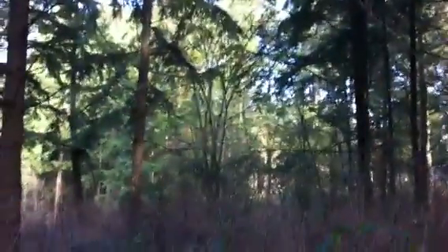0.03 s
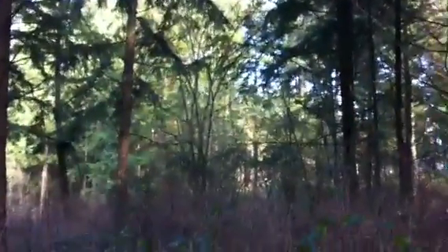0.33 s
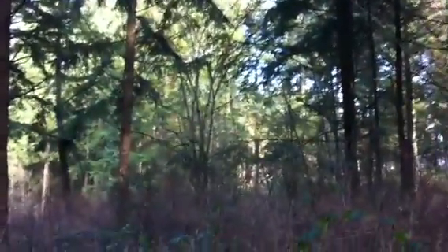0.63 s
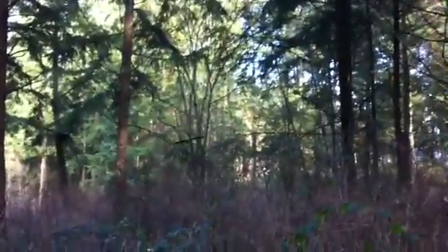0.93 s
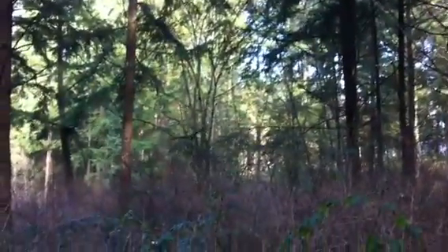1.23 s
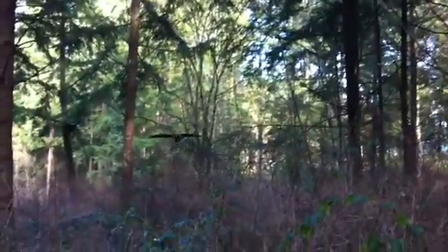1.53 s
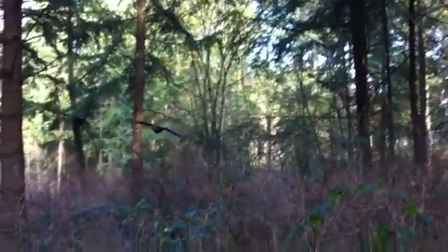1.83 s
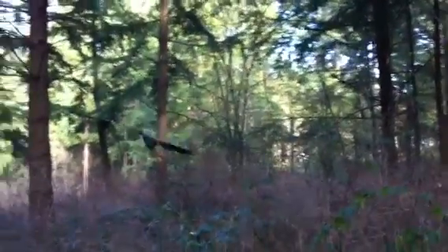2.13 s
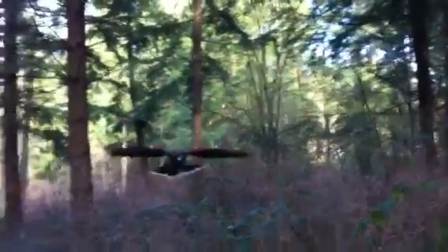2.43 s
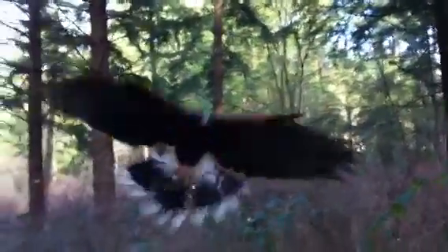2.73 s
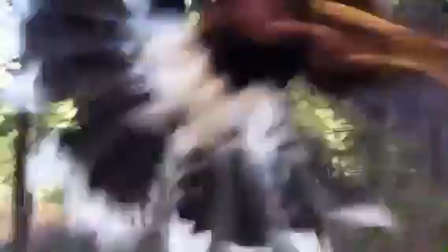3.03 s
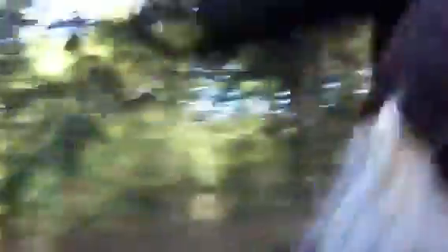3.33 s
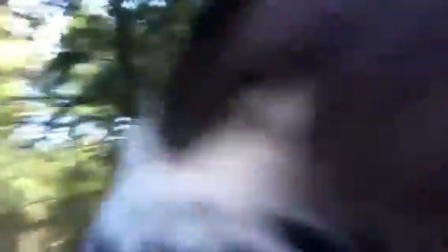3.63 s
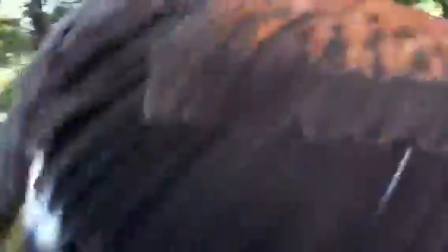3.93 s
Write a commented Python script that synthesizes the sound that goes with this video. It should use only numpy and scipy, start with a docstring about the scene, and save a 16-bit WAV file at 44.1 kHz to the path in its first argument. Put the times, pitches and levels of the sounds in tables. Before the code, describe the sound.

A hawk's little leg bells tinkle far off, then jingle close amid flapping wings.

```python
"""Quiet woodland: a trained hawk glides in and lands beside the microphone. Two small leg bells, struck by
their pellets, tinkle from afar, then jingle hard on landing, choked now and then by feathers. Feet thump on the
perch, talons scrape, metal, twigs and a feather click, wings buffet the air, feathers rustle. Behind: air in
the trees, a breeze, a far hoot, two chirps."""
import sys
import numpy as np
from scipy import signal
from scipy.io import wavfile
from scipy.ndimage import uniform_filter1d

SR = 44100
rng = np.random.default_rng(int(sys.argv[2]) if len(sys.argv) > 2 else 0)


def store_wav(level_fs):
    """Save 16-bit WAV to argv[1]."""
    pcm = np.round(np.clip(np.atleast_2d(level_fs), -1, 1) * 32767)
    wavfile.write(sys.argv[1], SR, pcm.T.astype(np.int16))


N = 176400
T = np.arange(N) / SR

# pellet strikes: (time [s], low bell [dB], high bell [dB], middle overtones [dB], shimmer [dB],
# top overtones [dB], base t60 until the next strike [s])
STRIKES = [(2.615, -64, -59, -78, -80, -66, .1), (2.792, -55.5, -51, -70, -53, -55, 0.053),
           (2.82, -72, -53.5, -92, -76, -63, 0.024), (2.845, -70.5, -58, -78, -69.5, -66, 0.036),
           (3.002, -48, -39, -48, -42, -52, 0.15), (3.047, -26, -40.5, -41.5, -33, -28, 0.65),
           (3.075, -56, -24, -38, -28, -46, 0.12), (3.096, -37, -29.5, -39.5, -25.5, -35, .11),
           (3.127, -39.5, -39, -46.5, -51, -57, .17), (3.166, -41, -33, -60, -43, -42.5, 0.23),
           (3.2023, -35, -17, -35, -27, -22, 0.21), (3.205, -43, -14, -33, -12, -24, 0.081),
           (3.2156, -36, -15, -61, -35, -45, 0.078), (3.2237, -42, -15, -56, -16, -28, .11),
           (3.2365, -42, -22, -55, -18.5, -21.5, 0.11), (3.249, -43, -45, -65, -47, -22.5, 0.023),
           (3.2739, -35, -25, -56, -27, -44.5, 0.061), (3.3034, -42, -24, -51, -29.5, -38, .13),
           (3.317, -43, -23, -62, -33, -40.5, .11), (3.335, -45, -28.5, -74, -32, -51, 0.26),
           (3.399, -44, -26.5, -54, -43, -72, .1), (3.431, -40, -34, -74, -74, -71, 0.027),
           (3.4614, -53, -49, -60, -47, -58, 0.24), (3.4734, -47, -38, -56, -49, -75, 0.082),
           (3.5166, -53, -37, -61, -66, -79, 0.035), (3.5335, -42, -31.5, -56, -44.5, -56.5, 0.076),
           (3.563, -81.5, -43.5, -72, -59, -54.5, 0.022), (3.592, -49.5, -55.5, -66.5, -71, -75, 0.022),
           (3.6375, -43.5, -35.5, -56.5, -47, -55, 0.11), (3.6667, -39.5, -40, -56.5, -61, -61, 0.032),
           (3.683, -48.5, -44, -64, -44.5, -68, .05), (3.7066, -50, -55.5, -72, -51.5, -67, 0.032),
           (3.721, -51, -50.5, -71.5, -68, -74.5, 0.024), (3.7916, -41.5, -40, -76.5, -72, -72, 0.015),
           (3.8363, -39.5, -37, -58, -27, -42, 0.076), (3.8469, -33, -42.5, -59.5, -45, -55, 0.056),
           (3.9408, -57.5, -54.5, -79, -78, -82, 0.026), (3.9563, -57.5, -57.5, -76.5, -80, -80.5, 0.026),
           (3.987, -53, -48.5, -76, -79, -79, 0.033)]
# bell modes, one list per strike level column: (frequency [Hz], level [dB], t60 factor [-])
BELL_MODES = [
    [(2652, -3.5, 0.95), (2790, -9.5, 0.25)],
    [(2994, -3, 0.68), (2846, -6, .25), (3170, -27.5, 0.34)],
    [(6397, -2.5, 1.7), (6675, -6, .8)],
    [(10408, -4.5, 0.82), (10280, -19, 0.77), (10540, -19.5, .5)],
    [(12043, -4.5, 1.52), (12120, -9, 0.72), (12400, -14, .4), (13710, -22.5, .6)],
]
# hawk's approach: (time [s], speed [m/s])
APPROACH = [(2.6, 4.5), (3.0, 3), (3.1, 2.0), (3.22, 1.04), (3.4, -0.5)]
# distant pellet strikes: (time [s], level [dB])
FAR_STRIKES = [(.534, -64.5), (.585, -66), (.635, -66), (.70, -65), (1.2, -70), (1.30, -66), (1.34, -51.5),
               (1.41, -68), (1.455, -59), (1.50, -76), (1.616, -71), (1.743, -69)]
# foot and wing blows: (time [s], level [dB], centre pitch [Hz])
THUMPS = [(3.355, -14.5, 189), (3.370, -22, 397), (3.3995, -12.5, 650), (3.406, -44, 40),
          (3.4105, -16, 723), (3.403, -3, 330), (3.409, -3.5, 346), (3.4163, -12, 477), (3.424, -16.5, 482),
          (3.446, -30, 514), (3.452, -10.5, 292), (3.483, -26.5, 505), (3.5035, -13.5, 446),
          (3.509, -14, 324), (3.5167, -13.5, 204), (3.564, -21, 442), (3.6924, -24, 394),
          (3.7031, -12.5, 248), (3.707, -17.5, 390), (3.717, -21, 318), (3.748, -30, 385), (3.83, -29, 426),
          (3.873, -22.5, 276), (3.884, -26, 198), (3.905, -29, 377)]
# wing strokes: (peak time [s], Gaussian width [s], level [dB])
WING_STROKES = [(3.337, 0.0099, -30.5), (3.363, 0.016, -25.5), (3.412, 0.02, -22), (3.451, 0.0064, -25.5),
                (3.488, 0.012, -25.5), (3.516, 0.012, -24.5), (3.557, 0.016, -28), (3.579, 0.011, -35.5),
                (3.613, 0.011, -28.5), (3.667, 0.0086, -27.5), (3.711, 0.016, -28), (3.752, 0.0051, -28.5),
                (3.802, 0.029, -44), (3.872, 0.025, -34.5), (3.907, 0.015, -31.5), (3.945, 0.056, -53.5)]
# contacts: (time [s], level [dB])
CLICKS = [(2.138, -47.5), (2.527, -44), (2.724, -44), (3.002, -46), (3.0127, -31.5), (3.046, -17.5),
          (3.076, -28), (3.098, -32), (3.2022, -21.5), (3.206, -26), (3.223, -32), (3.233, -31.5),
          (3.273, -30), (3.277, -41), (3.3046, -34), (3.6018, -36.5), (3.8365, -42.5)]  # metal, twigs; the one at 3.6 s is a feather flick
SCRAPES = [(3.207, -40), (3.222, -47), (3.238, -45), (3.254, -40), (3.278, -46), (3.334, -44), (3.346, -48),
           (3.424, -45), (3.502, -52)]  # talons
# small birds: (time [s], level [dB], centre pitch [Hz])
CHIRPS = [(0.316, -71, 4420), (1.95, -72, 5820)]
# hoot partials: (frequency [Hz], level [dB])
HOOT_TONES = [(603, -65.5), (699, -65.5)]

# envelopes: (time [s], level [dB])
RUSTLE_ENVELOPE = [(2.98, -69), (3.08, -56), (3.17, -59), (3.23, -52.5), (3.29, -58), (3.40, -50.5),
                   (3.5, -70), (3.65, -62), (3.85, -67), (4.0, -70)]
HOOT_ENVELOPE = [(.2, -37), (.27, -2.5), (.34, -6.5), (.42, 3.5), (.48, 1.5), (.54, -15), (.7, -22)]
AIR_ENVELOPE = [(0, -65.5), (.25, -64.5), (1.0, -65), (1.8, -64), (2.9, -63.5), (4.0, -64.5)]

# spectra: (frequency [Hz], relative level [dB])
RATTLE_SPECTRUM = [(150, -22.5), (1000, -18), (2000, -23), (2550, 1), (3050, 7.5), (3600, -15),
                   (5200, -29.5), (6500, -7.5), (8500, -31), (10400, -20), (11300, -23.5), (12300, -7),
                   (14000, -15.5), (16000, -26.5)]
BUFFET_SPECTRUM = [(25, -39), (68, -29), (100, -13), (145, 5), (210, 3), (330, -5.5), (480, -21),
                   (700, -31.5), (1100, -64), (2500, -59)]
FLAP_SPECTRUM = [(40, -24.5), (200, 8), (450, 9.5), (700, 0.5), (1000, -12.5), (1500, -20.5), (2500, -39),
                 (6000, -44), (15000, -72)]
CLICK_SPECTRUM = [(200, -21), (1500, -29.5), (3000, 3), (5500, -5.5), (9000, 1), (13000, -12),
                  (16000, -19.5)]
SCRAPE_SPECTRUM = [(150, -16), (500, 3.5), (1100, -11.5), (1700, 1.5), (2400, -8.5), (4300, -6),
                   (6000, -12), (15000, -25.5)]
RUSTLE_SPECTRUM = [(30, -17), (90, -0.5), (250, 7), (700, 1.5), (1700, -8), (4000, -10.5), (9000, -13),
                   (16000, -18)]
BREEZE_SPECTRUM = [(100, -53.5), (500, -8), (1100, 2.5), (1700, 4), (2600, -17.5), (8000, -33.5)]
AIR_SPECTRUM = [(15, -54), (25, -33), (32, -24.5), (91, -16.5), (136, 1.5), (221, -6), (260, -8),
                (305, -2.5), (433, -9.5), (537, -0.5), (741, -2.5), (1020, 2.5), (2420, -10), (3000, -12.5),
                (3340, -14), (3830, -14), (11200, -18.5), (12200, -18), (15500, -17)]

SOUND_M_PER_S = 343


def bells():
    """Two leg bells: struck shell modes plus pellet rattle."""
    ring = sum(amp(db) * bell_mode(hz, t60_factor, [(row[0], row[1 + k], row[-1]) for row in STRIKES])
               for k, family in enumerate(BELL_MODES) for hz, db, t60_factor in family)
    return ring + pellet_rattle(ring)


def bell_mode(hz, t60_factor, strikes, detune=0.002, band_hz=680):
    """One shell mode. Each strike adds energy and kicks the phase; feathers set the decay."""
    out = np.zeros(N)
    phasor = 1e-9 * np.exp(2j * np.pi * rng.random())
    edges = [round(row[0] * SR) for row in strikes] + [N]
    draws = rng.standard_normal((len(strikes), 2))
    for (time_s, db, t60_s), start, end, (side, bend) in zip(strikes, edges, edges[1:], draws):
        phasor += 1j * np.sign(side) * amp(db) * np.exp(1j * np.angle(phasor))  # quadrature kick
        doppler = np.interp(time_s, *np.transpose(APPROACH)) / SOUND_M_PER_S
        pitch_hz = hz * (1 + detune * bend + doppler)
        decay_per_s = np.log(1000) / (t60_s * t60_factor)
        ring = phasor * np.exp((2j * np.pi * pitch_hz - decay_per_s) * T[:end - start + 1])
        out[start:end], phasor = ring[:-1].real, ring[-1]
    band = signal.butter(1, [hz - band_hz / 2, hz + band_hz / 2], "bandpass", fs=SR)
    return np.sqrt(2) * signal.lfilter(*band, out)


def pellet_rattle(ring, gain_db=-14.5, settle_s=0.045, rest=0.27):
    """Pellets roll in the shells, in step with the ringing, hardest just after a strike."""
    ring_rms = np.sqrt(abs(signal.lfilter(np.ones(128) / 128, 1, ring ** 2)))
    strikes_s = np.array([row[0] for row in STRIKES])
    since_s = abs(T - strikes_s[np.maximum(np.searchsorted(strikes_s, T) - 1, 0)])
    shake = ring_rms * (rest + np.exp(-since_s / settle_s))
    return amp(gain_db) * colour(shake * grains(per_s=1000, spread_db=3), RATTLE_SPECTRUM)


def far_bells(rise_s=0.016, t60_s=0.15):
    """Distant strikes, softened and smeared by trees. Mostly the high bell carries."""
    envelope, t = np.zeros(N), T[:SR // 2]
    strike = np.minimum(t / rise_s, 1) * np.exp(-np.log(1000) * t / t60_s)
    for time_s, db in FAR_STRIKES:
        add(envelope, time_s, amp(db) * strike)
    high_bell = smeared_tone(hz=3024)
    low_bell = amp(-15) * smeared_tone(hz=2780)
    overtones = amp(-19) * sum(smeared_tone(hz) for hz in (6600, 10550, 12300))
    return envelope * (high_bell + low_bell + overtones)


def thumps(width_cycles=0.52, sag=0.37):
    """Soft blows of feet and wings: one short swing each, sagging in pitch."""
    out = np.zeros(N)
    t = T[:SR // 10] - T[SR // 10] / 2
    for time_s, db, hz in THUMPS:
        cycles = hz * t - sag * np.log(np.cosh(hz * t))
        swing = gaussian(cycles, width_cycles) * np.sin(2 * np.pi * cycles)
        add(out, time_s + t[0], -amp(db) * swing)
    return out


def wings(flap_db=-19.5, flap_exponent=2.92):
    """Strokes push air on the microphone; hard ones also flap the feathers."""
    push = np.sqrt(sum((amp(db) * gaussian(T - time_s, width_s)) ** 2
                       for time_s, width_s, db in WING_STROKES))
    buffet = push * steady(colour(rng.standard_normal(N), BUFFET_SPECTRUM))
    flap = (push / push.max()) ** flap_exponent * grains(per_s=1100, spread_db=9)
    return buffet + amp(flap_db) * colour(flap, FLAP_SPECTRUM)


def clicks(decay_s=0.0016, tail_s=0.008, tail_db=-35):
    """Metal, twigs and a feather flick: dry snaps with a short tail."""
    out, t = np.zeros(N), T[:SR // 10]
    envelope = np.exp(-t / decay_s) + amp(tail_db) * np.exp(-t / tail_s)
    for time_s, db in CLICKS:
        add(out, time_s, amp(db) / 2 * envelope * rng.standard_normal(len(t)))
    return colour(out, CLICK_SPECTRUM)


def talon_scrapes(width_s=0.0024):
    """Talons and straps scrape as the hawk takes hold."""
    grip = sum(amp(db) * gaussian(T - time_s, width_s) for time_s, db in SCRAPES)
    return grip * colour(grains(per_s=5100, spread_db=3), SCRAPE_SPECTRUM)


def feather_rustle():
    """Settling feathers: dense tiny contacts."""
    return level(RUSTLE_ENVELOPE) * colour(grains(per_s=2500, spread_db=4), RUSTLE_SPECTRUM)


def hoot(waver_hz=7):
    """One far two-tone hoot, wavering in pitch."""
    tones = np.zeros(N)
    for hz, db in HOOT_TONES:
        pitch_hz = hz + waver_hz * unit(uniform_filter1d(rng.standard_normal(N), size=500))
        tones += amp(db) * np.sqrt(2) * np.sin(2 * np.pi * np.cumsum(pitch_hz) / SR)
    return level(HOOT_ENVELOPE) * tones


def chirps(width_s=0.013, glide_hz_per_s=-3000):
    """Small far birds: short falling whistles."""
    out = np.zeros(N)
    for time_s, db, hz in CHIRPS:
        t = T - time_s
        cycles = (hz + glide_hz_per_s * t / 2) * t
        out += amp(db) * gaussian(t, width_s) * np.sin(2 * np.pi * cycles)
    return out


def air(low_cut_hz=88):
    """Air in the trees: near-steady broadband noise."""
    low_cut = signal.butter(2, low_cut_hz, "highpass", fs=SR, output="sos")
    noise = signal.sosfilt(low_cut, colour(rng.standard_normal(N), AIR_SPECTRUM))
    return level(AIR_ENVELOPE) * unit(noise)


def breeze(peak_db=-70.5, peak_s=1.34, width_s=0.69):
    """One slow swell of wind noise."""
    return amp(peak_db) * gaussian(T - peak_s, width_s) * colour(rng.standard_normal(N), BREEZE_SPECTRUM)


def amp(db):
    """dB to gain."""
    return 10 ** (np.asarray(db) / 20)


def unit(x):
    """Scale to rms 1."""
    return x / np.sqrt(np.mean(x ** 2) + 1e-20)


def level(points):
    """Gain curve from (time [s], level [dB])."""
    return amp(np.interp(T, *np.transpose(points)))


def gaussian(x, width):
    """Pulse of height 1 at x = 0."""
    return np.exp(-(x / width) ** 2 / 2)


def add(mix, time_s, sound):
    """Mix in at time_s."""
    part = mix[round(time_s * SR):][:len(sound)]
    part += sound[:len(part)]


def colour(x, spectrum, fft_size=4096):
    """Minimum-phase, unit-energy filter from (frequency [Hz], level [dB])."""
    hz, db = np.transpose(spectrum)
    bins_hz = abs(np.fft.fftfreq(fft_size, 1 / SR))
    log_gain = np.log(amp(np.interp(np.log(bins_hz + 1), np.log(hz), db)))
    response = np.exp(np.conj(signal.hilbert(log_gain)))
    taps = np.fft.ifft(response).real[:fft_size // 2]
    return signal.oaconvolve(x, taps / np.linalg.norm(taps))[:len(x)]


def grains(per_s, spread_db):
    """Random tiny impacts of uneven size, rms 1."""
    size = amp(spread_db * np.minimum(rng.exponential(1, N), np.pi))
    polarity = rng.choice([-1, 1], N)
    return unit(size * polarity * (rng.random(N) < per_s / SR))


def steady(x, window_samples=900):
    """Even out slow swells: divide by running rms."""
    return x / np.sqrt(abs(uniform_filter1d(x ** 2, window_samples)) + 1e-12)


def smeared_tone(hz):
    """Steady narrowband noise around hz."""
    slow_noise = uniform_filter1d(uniform_filter1d(rng.standard_normal(N), size=250), size=125)
    return steady(unit(slow_noise) * np.cos(2 * np.pi * hz * T))


def scene():
    """Hawk over quiet woodland, mono."""
    hawk = bells() + clicks() + far_bells() + talon_scrapes() + thumps() + wings() + feather_rustle()
    woodland = hoot() + chirps() + air() + breeze()
    return (hawk + woodland)[None]


def record(dry):
    """Steep low-pass band limit."""
    edge_hz = 16150
    taps = signal.firwin(401, edge_hz, window=("kaiser", 9), fs=SR)
    return signal.oaconvolve(dry, taps[None], "same")


dry = scene()
out = record(dry)
store_wav(out)
```